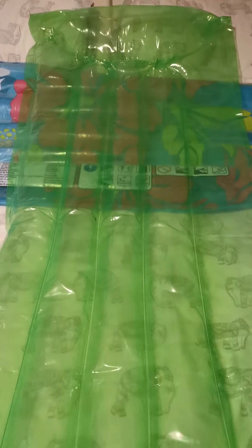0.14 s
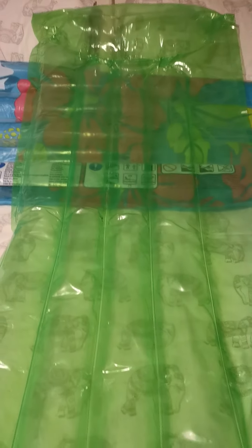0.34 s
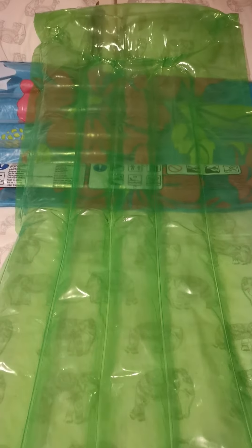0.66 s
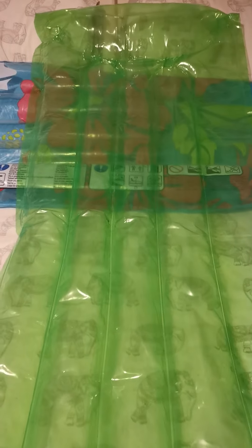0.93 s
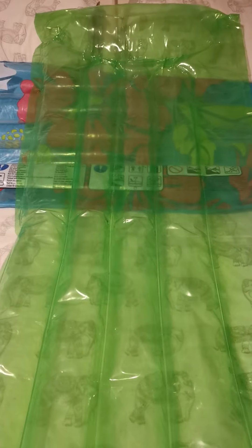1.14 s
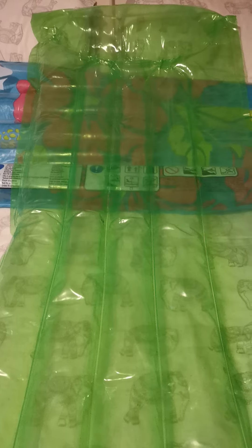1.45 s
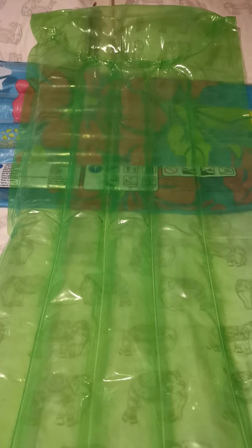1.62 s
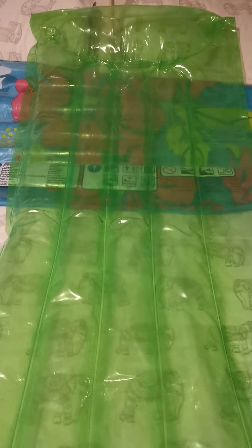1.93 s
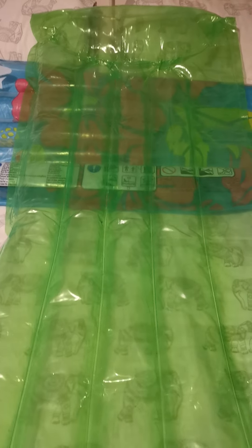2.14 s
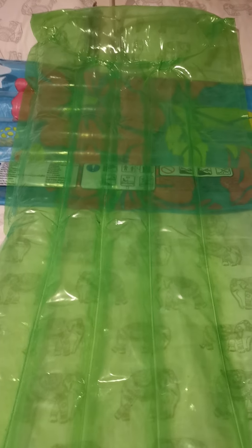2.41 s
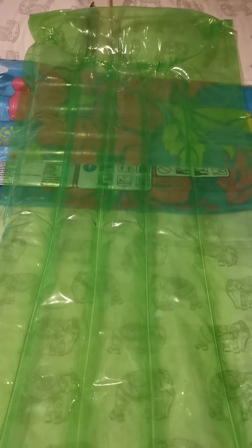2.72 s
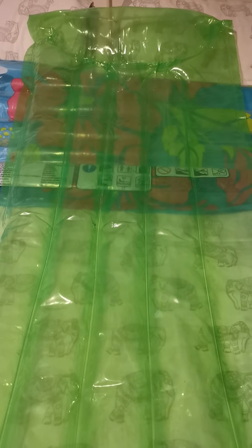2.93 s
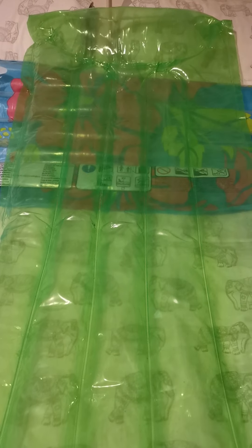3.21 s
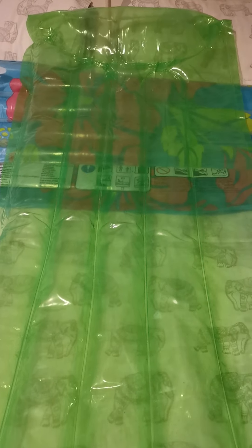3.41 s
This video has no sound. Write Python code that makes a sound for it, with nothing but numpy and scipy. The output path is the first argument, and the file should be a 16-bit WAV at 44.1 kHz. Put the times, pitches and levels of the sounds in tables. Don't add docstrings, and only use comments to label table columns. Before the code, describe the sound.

Steady motor hum with a wavering high whistle and airy rush as a deflating plastic bed ticks and creaks.

```python
import sys
import numpy as np
from scipy import signal
from scipy.io import wavfile
from scipy.ndimage import uniform_filter1d

SR = 44100
rng = np.random.default_rng(int(sys.argv[2]) if len(sys.argv) > 2 else 0)


def digitize_waveform(pressure):
    field = np.atleast_2d(pressure).T
    bounded = np.clip(field, -1, 1)
    quanta = np.round(bounded * 32767).astype(np.int16)
    wavfile.write(sys.argv[1], SR, quanta)


def boost(x):
    u = np.asarray(x, float) / 20
    return 10 ** u


N = 157437
MAINS_HZ = 100
SHAFT_LAG_RAD = -.2

# start_s, shaft_hz
SHAFT_SPEED = [
    (0.0, 349.25),
    (1.36, 348.77),
    (1.49, 348.53),
    (1.78, 348.51),
    (2.34, 349.78),
    (2.53, 349.66),
    (2.64, 349.44),
    (3.18, 348.9),
    (3.56, 348.99),
]


def motor():
    t = np.arange(N) / SR
    turn = 2 * np.pi * np.cumsum(curve(SHAFT_SPEED, 1, t)) / SR
    mains = 2 * np.pi * MAINS_HZ * t
    buzz = boost(-70) * np.cos(mains)
    return np.sqrt(2) * (shaft_hum(t, turn) + blade_whistle(t, turn, mains) + buzz)


# multiple, level_db, left_minus_right_db, waver_db
SHAFT_ORDERS = [
    (2, -61, -1, 2),
    (3, -47, -1.2, 1.6),
    (4, -61, -1, 2),
    (5, -44, -1.2, 1),
    (9, -58, -6, 2.5),
]
# start_s, level_db
HUM_LEVEL = [(0.0, -35), (0.03, -33.5), (1.95, -32), (2.34, -32.5), (2.49, -30.5), (3.26, -33), (3.54, -32),
             (3.57, -34)]


def shaft_hum(t, turn):
    lag = np.array([[SHAFT_LAG_RAD], [0]])
    hum = boost(curve(HUM_LEVEL, 1, t) + np.array([[-.4], [.3]])) * np.cos(turn + lag)
    for multiple, db, left_db, waver_db in SHAFT_ORDERS:
        angle = round(multiple) * turn + 2 * np.pi * rng.random() + lag
        level = db + np.array([[left_db], [0]]) + waver_db * drift(t, 0.368, 9)
        hum += boost(level) * np.cos(angle)
    return hum


# start_s, right_db, left_db, left_lead_rad
BLADE_TONE = [(0, -28, -36, -.6), (.12, -27, -34, -1.1), (.3, -26, -47, -2.8), (.6, -25, -37.5, -4.3),
              (.97, -26, -39, -5.6), (1.06, -32, -35, -5.8), (1.2, -35.5, -37, -7), (1.32, -31, -47, -8.2),
              (1.58, -48, -44, -9), (1.8, -39, -34, -10.8), (2.05, -24.5, -38, -11.8),
              (2.25, -27, -44, -12), (2.47, -26.5, -35, -10.8), (2.58, -46, -36, -11.4),
              (2.68, -37, -48, -13.2), (3.05, -37, -47, -13.7), (3.3, -31, -45, -12.5),
              (3.57, -33, -42, -11.4)]
# start_s, right_db, left_db, left_lead_rad
BLADE_OCTAVE = [(.07, -24, -32.5, -3.8), (.22, -16.5, -31, -4), (.53, -22.5, -41, -1.6),
                (.72, -17.5, -39, -2.2), (.95, -20, -30.5, -3), (1.08, -26, -31, -4.2),
                (1.25, -19.5, -46, -8.4), (1.55, -20, -39, -7.5), (1.68, -25, -31, -5.3),
                (1.85, -22, -34, -3.5), (2.12, -25, -36, -3.2), (2.31, -21.5, -28, -4.6),
                (2.48, -34, -46, -6.4), (2.55, -25, -39, -8.5), (2.65, -27, -43, -10.8),
                (2.9, -21, -31.5, -12), (3.45, -19.5, -36, -12), (3.57, -22.5, -48, -11.5)]
# start_s, level_db
BLADE_THIRD = [(0, -68), (.07, -59), (.17, -68), (.3, -57), (.85, -56), (1.05, -55), (1.2, -68), (1.5, -54),
               (1.73, -64), (1.9, -55), (2.3, -61), (2.48, -67), (2.57, -57), (2.75, -63), (3.1, -53),
               (3.43, -56), (3.5, -66), (3.57, -58)]
UPPER_LEADS = [-1, -.6]


def blade_whistle(t, turn, mains):
    blades, fourth_db = 10, -73
    wander_rad, shake_db, mains_side = .4, .7, boost(-29)
    third = curve(BLADE_THIRD, 1, t)
    levels = [
        [curve(BLADE_TONE, 2, t), curve(BLADE_TONE, 1, t)],
        [curve(BLADE_OCTAVE, 2, t), curve(BLADE_OCTAVE, 1, t)],
        [third + 4 + 2 * drift(t, 0.78, 6.3), third + 6],
        [fourth_db - 4 + 0 * t, fourth_db + 2 * drift(t, 0.59, 6.4)],
    ]
    leads = [curve(BLADE_TONE, 3, t), curve(BLADE_OCTAVE, 3, t)]
    leads += [lead + wander_rad * drift(t, 0.043, 2.1) for lead in UPPER_LEADS]
    whistle = np.zeros((2, N))
    for k, level in enumerate(levels):
        hand_shake = np.array([drift(t, 2.58, 27), drift(t, 1.33, 30)])
        angle = (k + 1) * blades * turn + np.array([leads[k], 0 * t])
        tone = np.cos(angle)
        tone += mains_side * np.cos(angle + mains) + .5 * mains_side * np.cos(angle - mains)
        whistle += boost(level + shake_db * hand_shake) * tone
    return whistle


# freq_hz, density_db
RUSH_TONE = [(30, -69), (90, -30), (230, -24), (430, -16.5), (620, -21.5), (1500, -17), (3000, -24),
             (6500, -13.5)]
# freq_hz, level_db
LEFT_TONE = [(60, -2), (1300, -0.5), (2400, -7), (3600, -12), (4500, -8.5), (6200, -4), (7500, -4.5),
             (9000, 7.5)]
# start_hz, glide_hz_per_s, width_hz, level_db, aim_change_db
HOUSING_MODES = [
    (1047, -35, 244, -18.5, -1),
    (1950, -4, 290, -14.5, 8),
    (2450, -4, 685, -5, -0.2),
    (3695, -53, 750, -2, 1),
    (4435, 120, 1320, -1.5, -2.5),
    (5650, 27, 1400, -8, -2),
    (7120, -3, 410, -12.5, -1),
    (7580, -5, 410, -8.5, -1),
]
# freq_hz, likeness_0_to_1
EAR_LIKENESS = [(30, 0.64), (110, 1), (380, 0.98), (1280, 0.97), (2370, 0.75), (4370, 0.61), (8070, 0.68),
                (14900, 0.78)]
# freq_hz, lead_rad
EAR_LEAD = [(60, -1), (700, 0.43), (2600, 0.16), (3300, 1.15), (4390, 2.5), (6120, 3.5), (7060, 6),
            (12000, -1)]
# start_s, aim
PHONE_AIM = [(0, 0.44), (.5, 0.44), (.9, 0.64), (1.2, 0.056), (1.45, -0.34), (1.7, -1.8), (1.95, 0.029),
             (2.2, 0.38), (2.4, -0.028), (2.7, -0.5), (3, -.2), (3.3, 0.3), (3.57, 0.12)]


def air_rush():
    hop, size = 256, 1024
    frames, hz = N // hop + 5, np.fft.rfftfreq(size, 1 / SR)[:, None]
    t = np.arange(frames) * hop / SR
    a, b, c, d, patches, flicker = rng.standard_normal((frames, len(hz), 6)).T
    power = boost(2 * read(RUSH_TONE, hz)) * np.ones(frames)
    aim = curve(PHONE_AIM, 1, t)
    for f, glide, width, db, aim_db in HOUSING_MODES:
        offset = 2 * (hz - f - glide * t) / width
        power += boost(2 * (db + aim_db * aim)) / (1 + offset ** 2) ** 2
    power *= boost(2 * -12 * np.maximum(hz - 8000, 0) / 1000)

    field = 1.2 * patchy(patches, 12, 16) - drift(t, 0.088, 2.26) + 0.82 * patchy(flicker, 90, 2)
    ripple = np.array([patchy(v, 3, 150) for v in rng.standard_normal((frames, len(hz), 2)).T])

    same, right = np.clip(read(EAR_LIKENESS, hz), 0, 1), a + 1j * b
    left = same * right + np.sqrt(1 - same ** 2) * (c + 1j * d)
    left = left * boost(read(LEFT_TONE, hz)) * np.exp(1j * read(EAR_LEAD, hz))
    spectrum = np.array([left, right]) * np.sqrt(power) * boost(field + ripple)
    air = signal.istft(spectrum, nperseg=size, noverlap=size - hop)[1][:, :N]
    return boost(-24.5) * air / np.sqrt(np.mean(air[1] ** 2))


# time_s (about the peak), peak_db, pitch_hz
CREAK_EVENTS = [(0.1115, -21, 2590), (0.144, -29, 2530), (0.276, -24, 2420), (0.298, -29, 2560),
                (0.348, -39, 2500), (0.4488, -33, 2540), (0.5161, -36, 2020), (0.5251, -25, 2140),
                (0.5363, -21, 2030), (0.5555, -28, 2420), (0.6794, -27, 2510), (0.7084, -28, 2380),
                (0.726, -23.5, 2440), (0.7496, -30, 2250), (0.822, -22, 2520), (0.8419, -29, 2650),
                (0.8559, -22, 2280), (0.8638, -20, 2410), (0.9037, -24, 2650), (0.952, -27, 2550),
                (1.055, -26, 2720), (1.0846, -26, 2230), (1.0938, -26, 2160), (1.1148, -34, 2470),
                (1.1261, -23.5, 2480), (1.2559, -23, 2480), (1.277, -18.5, 2540), (1.3824, -20.5, 2550),
                (1.3951, -21, 2400), (1.464, -18.5, 2370), (1.4943, -30, 2260), (1.5957, -22.5, 2130),
                (1.874, -18.5, 2160), (2.2974, -22, 2570), (2.3102, -18, 2095), (2.3252, -19, 2460),
                (2.338, -17, 2510), (2.3496, -15, 2420), (2.3628, -19.5, 2150), (2.3738, -20, 2210),
                (2.441, -23, 2440), (2.4684, -17.5, 2300), (2.4834, -26, 2590), (2.5333, -25, 2360),
                (2.6865, -20, 2490), (2.7035, -22, 2560), (2.7398, -22.5, 2470), (2.789, -22.5, 2490),
                (2.8037, -25, 1900), (2.8673, -26, 2530), (2.879, -21.5, 2420), (2.9137, -33, 2400),
                (2.9291, -27, 2580), (3.1494, -27.5, 2230), (3.205, -26, 2560), (3.232, -24.5, 2440),
                (3.307, -29, 2420), (3.3506, -23, 2150), (3.378, -21, 2450), (3.4027, -33, 2000)]
CREAK_S, CREAK_SAMPLES = 0.0033, 3000


def plastic():
    ticks_per_s, tick_db, tick_spread_db, clump_db = 120, -43.5, 3.5, 2
    count = round(ticks_per_s * N / SR)
    u = rng.random((count, 3))
    when = np.sort(u[:, 0]) * N / SR
    tick_level = tick_db + clump_db * drift(when, 1.5, 8)
    tick_level -= tick_spread_db * np.log(np.maximum(u[:, 1], 1 / 20))
    ticks = np.c_[when, tick_level, 1750 + 1000 * u[:, 2]]
    creaks = [(s - CREAK_S, db - 2, hz) for s, db, hz in CREAK_EVENTS]
    out = np.zeros(N + CREAK_SAMPLES)
    for s, db, hz in creaks + list(ticks):
        at = int(s * SR)
        out[at:at + CREAK_SAMPLES] += creak(db, hz, rng.standard_normal((CREAK_SAMPLES, 4)).T)
    band = signal.butter(3, [1750, 3400], "bandpass", fs=SR, output="sos")
    out = signal.sosfilt(band, out)
    return np.array([boost(-3.5) * np.roll(out, 2)[:N], out[:N]])


def creak(db, hz, jitter):
    tail_db, tail_s, upper_db = -12, 0.025, -24
    t = np.arange(CREAK_SAMPLES) / SR
    rise = t / CREAK_S
    snap = rise * np.exp(1 - rise) * np.exp(-(rise / 2) ** 2)
    tail = boost(tail_db - 60 * t / (5 * tail_s)) * np.minimum(rise, 1)
    z = uniform_filter1d(jitter, 22, axis=1)
    z = (z[:2] + 1j * z[2:]) / z.std() * 0.57 + 0.73
    ring = z[0] * np.exp(2j * np.pi * hz * t)
    ring += 0.65 * z[1] * np.exp(2j * np.pi * (4500 - hz) * t)
    ring += boost(upper_db) * z[1] * np.exp(2j * np.pi * 2.4 * hz * t)
    return boost(db) * (snap + tail) * ring.real


def hiss():
    return np.diff(rng.standard_normal((2, N + 1))) * boost([[-50.5], [-55]])


def evened(x):
    return x / np.sqrt(np.mean(abs(x) ** 2) + 1e-20)


def patchy(noise, bins, frames):
    blurred = uniform_filter1d(noise, bins, axis=0)
    return evened(uniform_filter1d(blurred, frames, axis=1))


def read(points, hz):
    f, value = np.transpose(points)
    return np.interp(np.log(hz + 1), np.log(f + 1), value)


def drift(t, lo_hz, hi_hz, count=16):
    f = np.geomspace(lo_hz, hi_hz, count)[:, None]
    coarse = np.arange(0, t[-1] + .01, .004)
    swings = np.sin(2 * np.pi * (f * coarse + rng.random((count, 1)))) / np.sqrt(f)
    return np.interp(t, coarse, evened(swings.sum(0)))


def curve(rows, column, t):
    rows = np.transpose(rows)
    return uniform_filter1d(np.interp(t, rows[0], rows[column]), size=len(t) // 120)


def scene():
    return motor() + air_rush() + plastic() + hiss()


def low_pass(x):
    return signal.sosfilt(signal.butter(12, 15160, fs=SR, output="sos"), x)


def record(dry):
    edge = signal.firwin(801, 15300, window=("kaiser", 9), fs=SR)
    mix = signal.oaconvolve(dry, edge[None], "same")
    return low_pass(mix)


dry = scene()
out = record(dry)
digitize_waveform(out)
```